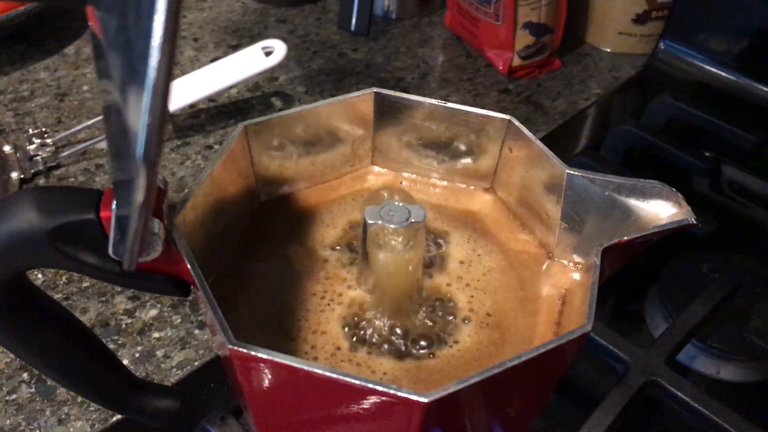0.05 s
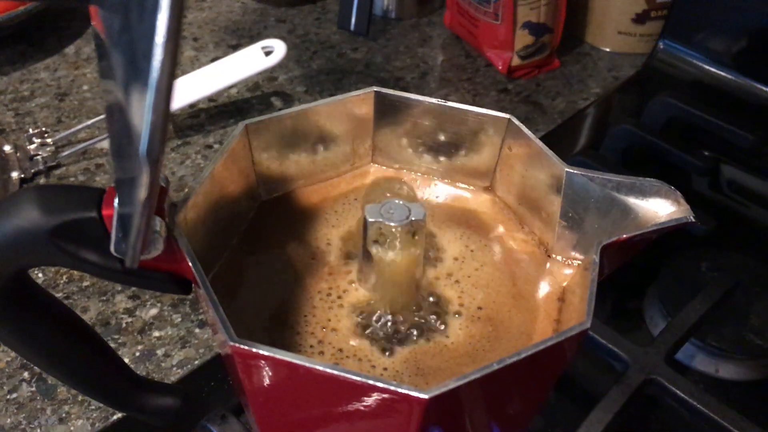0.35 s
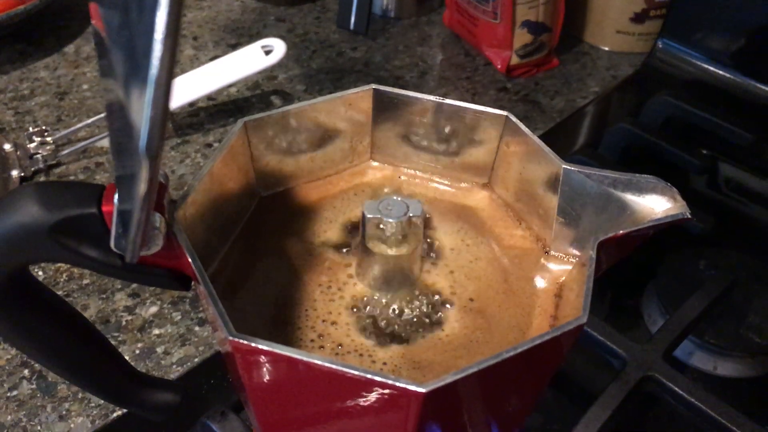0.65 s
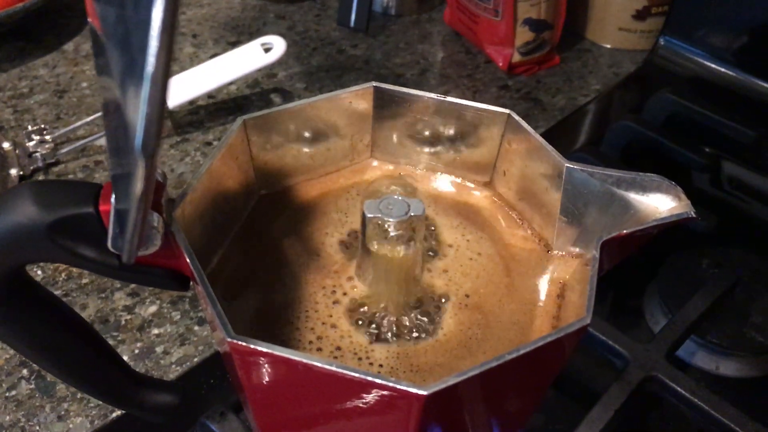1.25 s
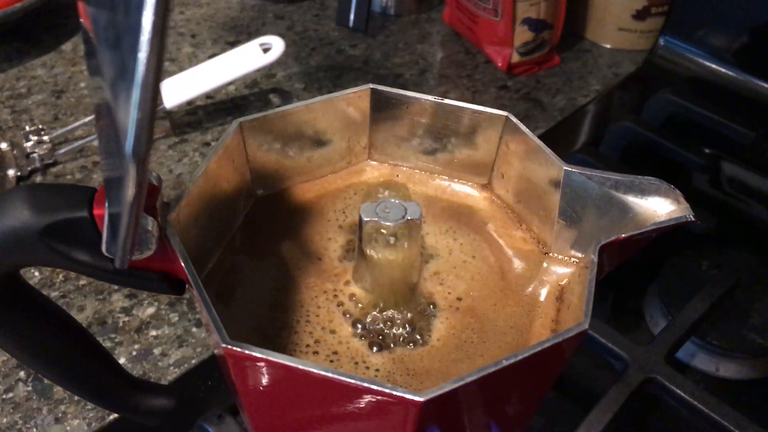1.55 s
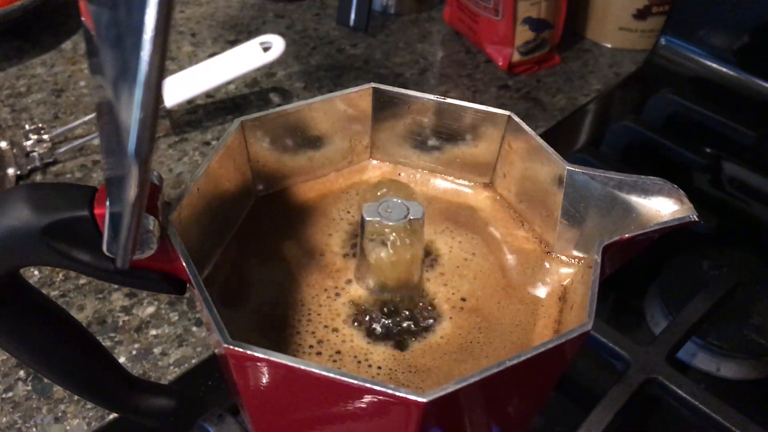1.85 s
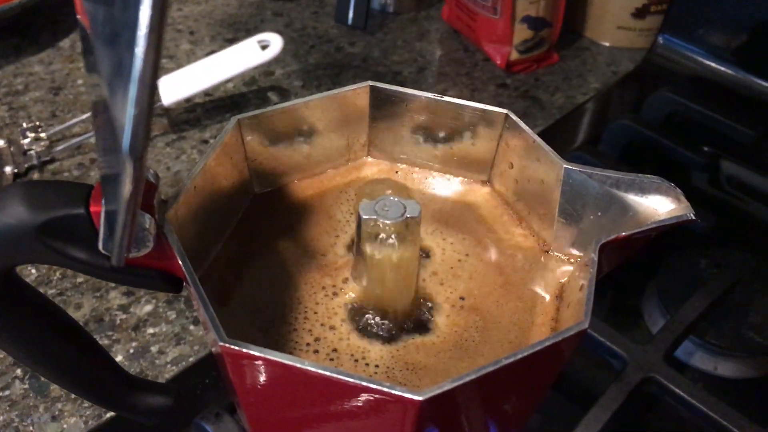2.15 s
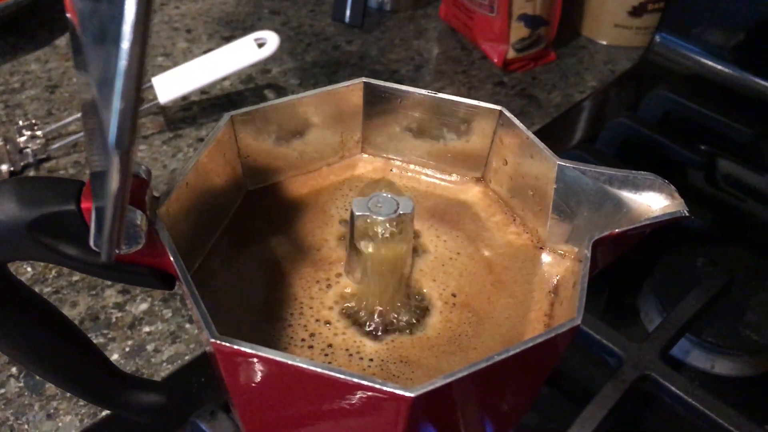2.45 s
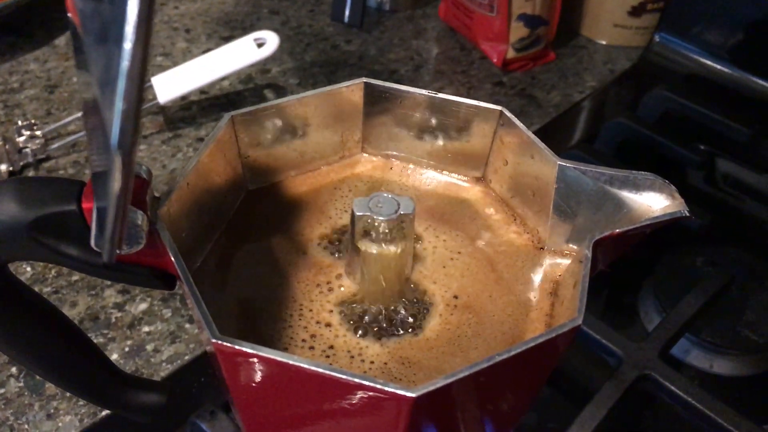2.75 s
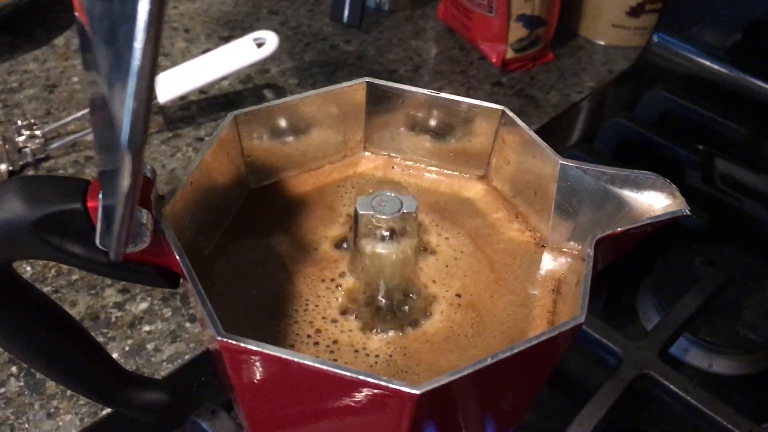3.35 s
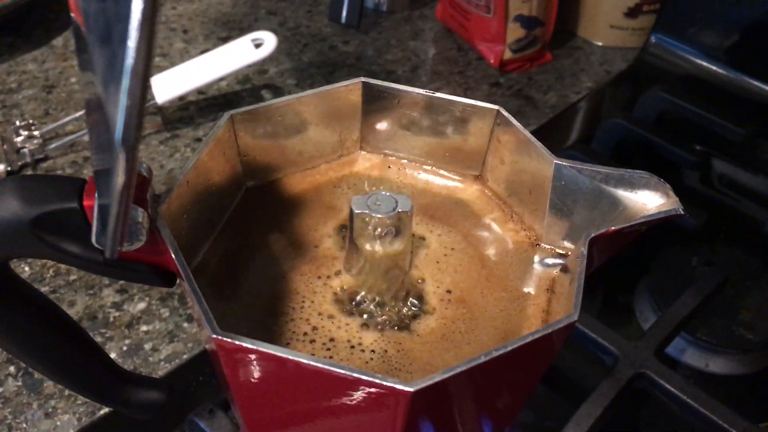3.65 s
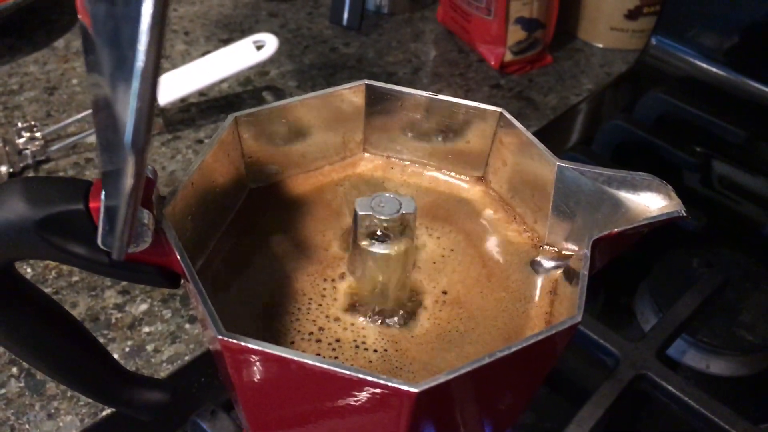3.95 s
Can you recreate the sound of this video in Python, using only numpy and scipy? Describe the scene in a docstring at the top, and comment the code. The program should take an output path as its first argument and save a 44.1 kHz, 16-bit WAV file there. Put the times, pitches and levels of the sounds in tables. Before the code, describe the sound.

A stovetop coffee pot bubbles and hisses steadily, its foam fizzing and spitting lightly.

```python
"""A stovetop coffee pot on a gas burner in a kitchen, the microphone close above its open lid.
The sound cuts in on a steady hollow rush of flame and steam over a mains hum, the coffee already
welling up in many small bubbles. In the first second the foam gives a run of sharp pops, which then
thin out while its fizz comes and goes. From about one second to three, droplets spit and set the
metal wall ringing faintly. The pot then brews on, with two more pops before the end."""
import sys
import numpy as np
from scipy import signal
from scipy.fft import rfft, irfft
from scipy.io import wavfile
from scipy.ndimage import uniform_filter1d

SR = 44100
rng = np.random.default_rng(int(sys.argv[2]) if len(sys.argv) > 2 else 0)


def output_pcm(signal):
    """Save a mono or channel-first signal as 16-bit PCM at the path in sys.argv[1].

    Samples are clipped to [-1, 1] before scaling.
    """
    pcm = np.clip(np.atleast_2d(signal).T, -1, 1) * 32767
    wavfile.write(sys.argv[1], SR, np.round(pcm).astype(np.int16))


N = 176400
TIME = np.arange(N) / SR


def amp(db):
    """Decibels to gain."""
    return 10 ** (np.asarray(db) / 20)


def unit(x):
    """Scales to rms 1."""
    return x / np.sqrt(np.mean(x ** 2) + 1e-20)


def level_at(spectrum, hz):
    """Reads an (f/Hz, level/dB) table on a log-frequency axis."""
    f, db = np.transpose(spectrum)
    return np.interp(np.log(hz + 1), np.log(f), db)


def add(mix, s, sound):
    """Mixes a sound in at time s."""
    part = mix[round(s * SR):][:len(sound)]
    part += sound[:len(part)]


def noise(gain, size=N):
    """Noise of rms 1 with its spectrum shaped by gain(f)."""
    white = rfft(rng.standard_normal(size))
    return unit(irfft(white * gain(np.fft.rfftfreq(size, 1 / SR)), size))


def drift(rate_hz):
    """Slow random wander of rms 1."""
    return noise(lambda f: (f > 0) * np.exp(-(f / rate_hz) ** 2))


def shower(sound, per_s, spread_db):
    """Repeats a sound at random moments, mostly small and a few large."""
    sizes = amp(spread_db * np.minimum(rng.exponential(1, N), 5))
    impulses = sizes * rng.choice([-1, 1], N) * (rng.random(N) < per_s / SR)
    return signal.oaconvolve(impulses, sound)[:N]


# An appliance in the background of the kitchen: f/Hz, level/dB
HUM_TONES = [(119.98, -49.5), (184, -68), (479.9, -58)]
def mains_hum(waver_rad=.06):
    """An appliance hums in steady tones that waver slightly in phase."""
    out = np.zeros(N)
    for hz, db in HUM_TONES:
        phase = 2 * np.pi * (hz * TIME + rng.random()) + waver_rad * drift(1.7)
        out += np.sqrt(2) * amp(db) * np.sin(phase)
    return out


def kitchen_echoes(direct, echo_db=-12, first_s=.004, last_s=.035, above_hz=3200, count=24):
    """Weak echoes from small surfaces near the microphone join the direct sound and comb its treble."""
    delays = np.linspace(first_s, last_s, count) + rng.uniform(0, 0.000998, count)
    taps = rng.choice([-1, 1], count) / np.sqrt(delays)
    taps *= amp(echo_db) / np.linalg.norm(taps)
    treble = signal.sosfilt(signal.butter(2, above_hz, "high", fs=SR, output="sos"), direct)
    out = direct.copy()
    for s, gain in zip(delays, taps):
        add(out, s, gain * treble)
    return out


# Spectrum of the flame, down under the pot: f/Hz, relative level/dB
FLAME_SPECTRUM = [(20, -30), (33, -11), (50, -1), (92, 3.5), (125, 1), (165, -6), (300, -7.5), (600, -33),
                  (1500, -55)]
def burner(level_db=-51):
    """The gas flame burns with a low, steady roar."""
    return amp(level_db) * noise(lambda f: amp(level_at(FLAME_SPECTRUM, f)))


# Spectrum of gas and steam, from just above the lid: f/Hz, relative level/dB
RUSH_SPECTRUM = [(100, -45), (320, -0.5), (600, 1.5), (780, -3), (1000, -2), (1200, 2), (1700, 0.5),
                 (1890, -5.5), (2100, -2.5), (2450, -6.5), (3100, -5.5), (3950, -8), (4500, -8.5),
                 (4850, -15.5), (6500, -15), (7500, -19), (9000, -19.5), (12000, -24.5), (16000, -28.5)]
# Hollow resonances of pot, hob and kitchen: f/Hz, width/Hz, level/dB
HOLLOW_RESONANCES = [(226, 57, -49.5), (385.5, 45, -58.5), (581, 48, -59), (709, 45, -58),
                     (841.5, 27, -64.5), (949, 19, -66.5), (1075.5, 33, -57.5), (1143, 83, -61.5),
                     (1460, 100, -58.5), (2046, 57, -65.5), (2246, 62, -62), (2760, 68, -66),
                     (2936, 75, -66), (4346, 240, -68), (5290, 66, -76), (6250, 71, -82)]
def steam_rush(hiss_db=-47, patch_db=0.66):
    """Turbulent gas and steam hiss and excite hollow resonances, patchy in time and pitch."""
    air = amp(hiss_db) * noise(lambda f: amp(level_at(RUSH_SPECTRUM, f)))
    for hz, width, db in HOLLOW_RESONANCES:
        air += amp(db) * noise(lambda f: 1 / (1 + ((f - hz) / (0.55 * width)) ** 2))
    frames = signal.stft(air, nperseg=512, noverlap=384)[2]
    patches = uniform_filter1d(rng.standard_normal(frames.shape), size=9, axis=0)  # smooth in pitch
    patches = unit(uniform_filter1d(patches, size=20, axis=1))  # and in time
    return signal.istft(frames * amp(patch_db * patches), nperseg=512, noverlap=384)[1][:N]


# Bubbles in the coffee, close below the microphone: f/Hz, level/dB of each bubble size
BUBBLE_LEVELS = [(500, -66.5), (1200, -66), (2500, -69.5), (4000, -74), (5200, -79.5), (8500, -74.5)]
def coffee_bubbles(per_s=2600, decay_cycles=6.55, pitch_rise=0.0553, sizes=36):
    """Small bubbles of many sizes well up and ring for a few cycles, rising in pitch."""
    t, out = np.arange(SR // 20) / SR, np.zeros(N)
    for hz in np.geomspace(BUBBLE_LEVELS[0][0], BUBBLE_LEVELS[-1][0], sizes):
        age = t * hz / decay_cycles
        envelope = (1 - np.exp(-t * hz)) * np.exp(-age)
        glide = 1 + pitch_rise * np.minimum(age, 4) / 2
        ring = envelope * np.sin(2 * np.pi * hz * t * glide)
        out += amp(level_at(BUBBLE_LEVELS, hz)) * unit(shower(ring, per_s / sizes, spread_db=2.5))
    return out


def foam_pop(hz, rise_s=.00008, decay_s=.0001, scatter_db=-20, scatter_s=.003):
    """A foam bubble bursts: a tiny ping and its scatter inside the pot."""
    t = np.arange(SR // 50) / SR
    envelope = (1 - np.exp(-t / rise_s)) ** 2 * np.exp(-t / decay_s)
    ping = envelope / envelope.max() * np.sin(2 * np.pi * hz * t)
    scatter = noise(lambda f: 1 / (1 + ((f - hz) / 3000) ** 2), len(t)) * np.exp(-t / scatter_s)
    return ping + amp(scatter_db) * scatter


# Fizz on top of the coffee, heard through the open lid: t/s, level/dB
FIZZ_LEVELS = [(0, -71), (.3, -65), (.62, -67), (.75, -75), (1.0, -71), (1.25, -62), (1.48, -67),
               (1.6, -74), (1.85, -65.5), (2.2, -71), (2.55, -64.5), (2.85, -67), (3.1, -64), (3.4, -68.5),
               (4, -67)]
# Larger foam bubbles bursting at close range: t/s, peak level/dB, f/Hz
LARGE_POPS = [(.2947, -39, 13500), (.3963, -42, 12500), (.4134, -37, 12500), (.4335, -38, 12000),
              (0.496, -37, 12000), (.6369, -40, 12500), (.8163, -42, 13000), (.9044, -39, 11500),
              (1.1483, -45, 12500), (1.3376, -43, 13000), (1.829, -41, 13000), (2.2004, -40, 12500),
              (2.3985, -39, 13000), (3.1378, -40, 12000), (3.6722, -36, 11500)]
def foam(per_s=640, low_hz=10500, high_hz=15000, sizes=10):
    """Tiny bursting bubbles make a fizz that comes and goes, with larger pops standing out."""
    pitches = np.linspace(low_hz, high_hz, sizes)
    fizz = sum(shower(foam_pop(hz), per_s / sizes, spread_db=3.5) for hz in pitches)
    out = amp(np.interp(TIME, *np.transpose(FIZZ_LEVELS))) * unit(fizz)
    for s, db, hz in LARGE_POPS:
        add(out, s, amp(db) * foam_pop(hz))
    return out


# Spectrum of a spit before its own tilt: f/Hz, relative level/dB
SPIT_SPECTRUM = [(500, -12), (2500, 0), (6000, 5.5), (9500, 4), (12000, 2.5), (16000, -7)]
# Droplets spitting just below the microphone: t/s, level/dB, tilt/(dB per octave), wall ring level/dB
DROPLETS = [(1.053, -36, 2, -56), (1.3655, -43, 1, -46), (1.475, -41, 6, -57), (2.007, -40, 5, -56),
            (2.097, -41.5, -3, -51), (2.469, -34, 1, -57), (2.915, -50, -4, -53)]
def droplet_spits(rise_s=.00012, crack_s=.00091, scatter_db=-10, scatter_s=.0088):
    """Each droplet cracks, scatters between the metal walls and sets one ringing faintly."""
    wall_hz, wall_decay_s, pivot_hz = 6240, .0058, 8000
    t, out = np.arange(SR // 16) / SR, np.zeros(N)
    decay = np.hypot(np.exp(-t / crack_s), amp(scatter_db) * np.exp(-t / scatter_s))
    envelope = (1 - np.exp(-t / rise_s)) * decay
    wall_ring = np.exp(-t / wall_decay_s) * np.sin(2 * np.pi * wall_hz * t)
    for s, db, tilt, ring_db in DROPLETS:
        def colour(f):
            octaves = np.log2(np.maximum(f / pivot_hz, .5))
            return amp(level_at(SPIT_SPECTRUM, f) + tilt * octaves)
        crack = envelope * noise(colour, len(t))
        add(out, s, amp(db) * crack + amp(ring_db) * wall_ring)
    return out


# Strength of the boil in the pot: t/s, relative level/dB
BOIL_STRENGTH = [(0, 0), (.25, 0), (.55, 0.2), (.72, -0.3), (.95, 0), (1.08, 0.3), (1.2, 0.3), (1.35, .3),
                 (1.5, 0.5), (1.68, 0), (2.0, .1), (2.27, -.4), (2.45, .6), (2.8, -0.1), (3.08, .5),
                 (3.25, 0), (3.45, .5), (4, 0.5)]
def scene():
    """All sources from above the pot; the flow swells and flickers, driving rush and bubbles together."""
    flicker_db = 0.45 * drift(rate_hz=60)
    flow = amp(np.interp(TIME, *np.transpose(BOIL_STRENGTH)) + flicker_db)
    background = mains_hum() + burner()
    brew = kitchen_echoes(flow * (steam_rush() + coffee_bubbles()))
    return (background + brew + foam() + droplet_spits())[None]


def record(dry):
    """One close microphone: its port dips the treble, the sound cuts in, and the top is band-limited."""
    port_hz, port_width_hz, port_db = 10400, 480, -4.5
    cut_in_s, band_limit_hz = .084, 15800
    f = np.fft.rfftfreq(N, 1 / SR)
    port_dip = amp(port_db * np.exp(-((f - port_hz) / port_width_hz) ** 2))
    live = irfft(rfft(dry) * port_dip, N) * (TIME >= cut_in_s)
    lowpass = signal.firwin(801, band_limit_hz, window=("kaiser", 8), fs=SR)
    return signal.oaconvolve(live, lowpass[None], "same")


dry = scene()
out = record(dry)
output_pcm(out)
```